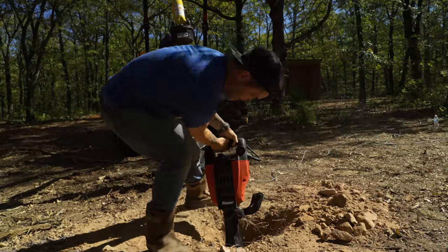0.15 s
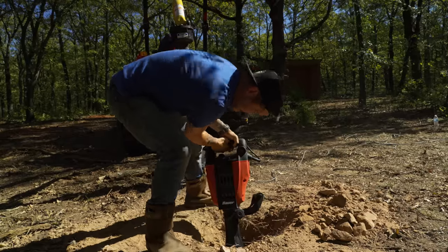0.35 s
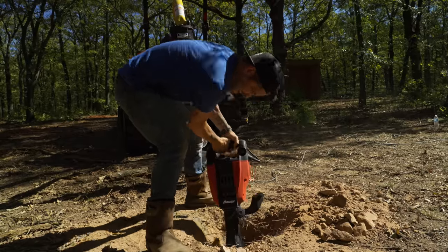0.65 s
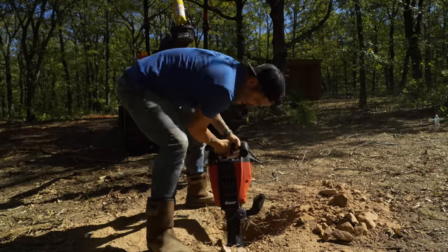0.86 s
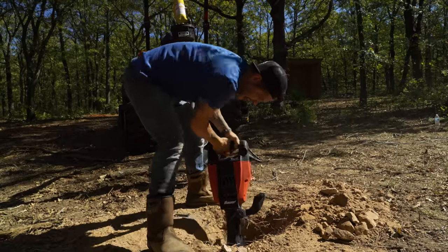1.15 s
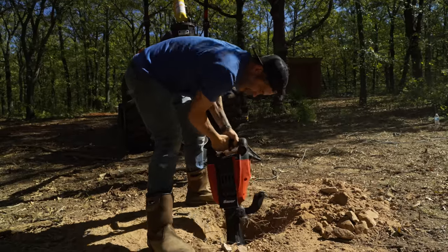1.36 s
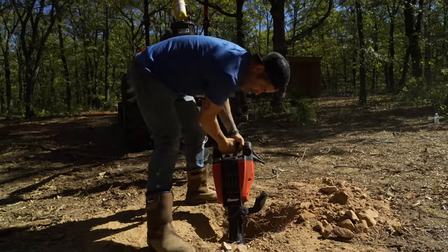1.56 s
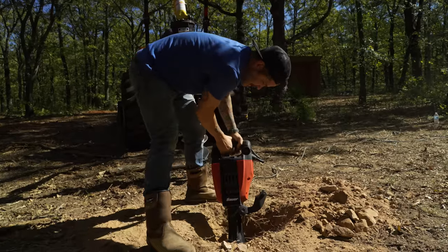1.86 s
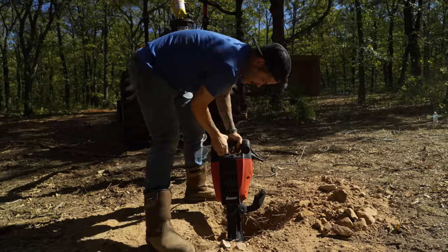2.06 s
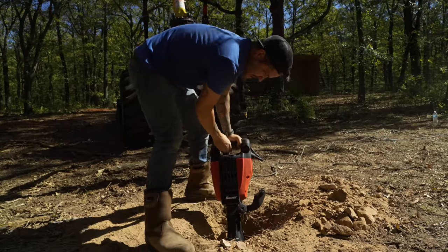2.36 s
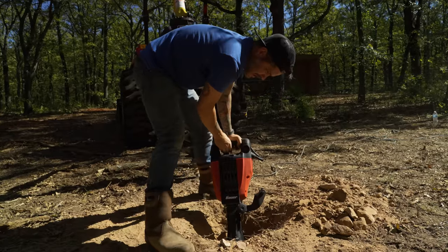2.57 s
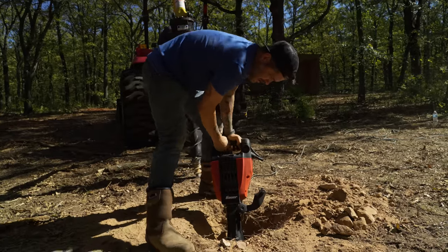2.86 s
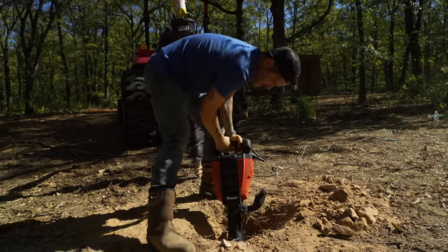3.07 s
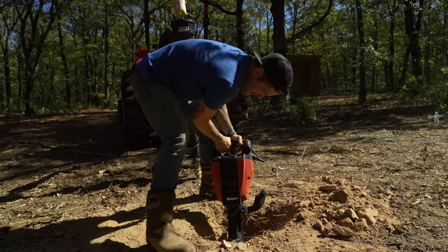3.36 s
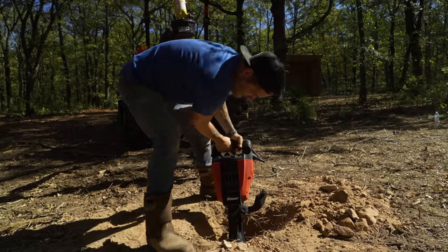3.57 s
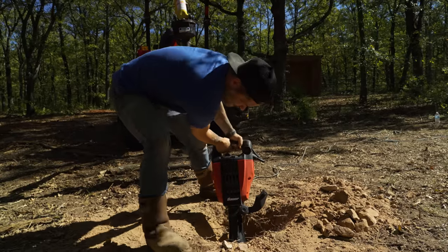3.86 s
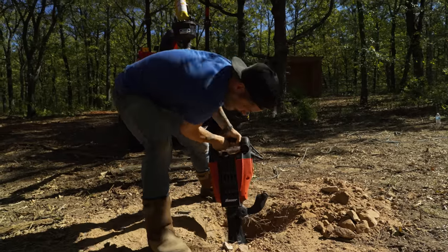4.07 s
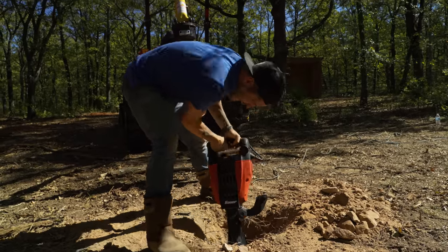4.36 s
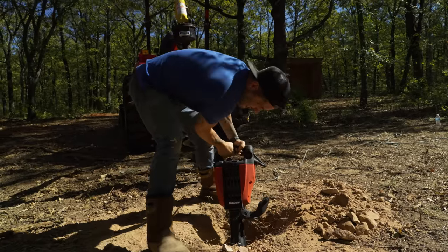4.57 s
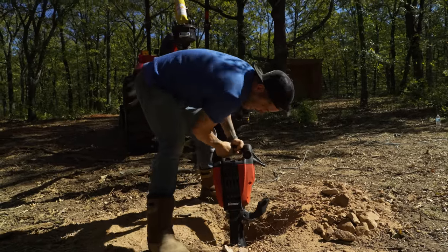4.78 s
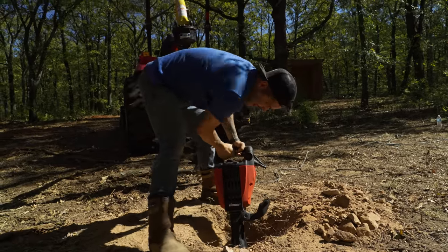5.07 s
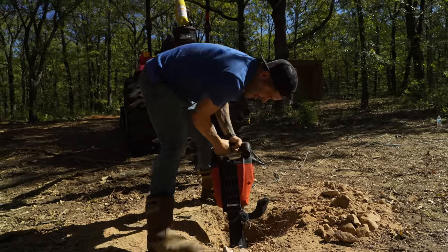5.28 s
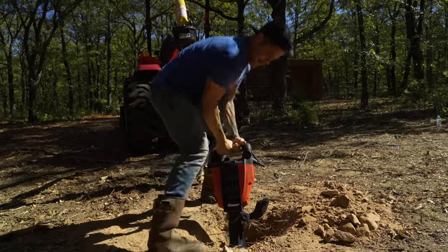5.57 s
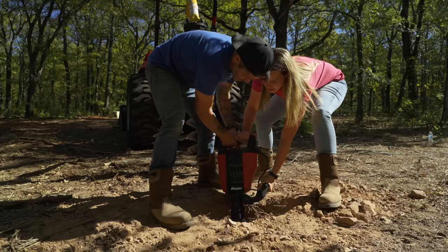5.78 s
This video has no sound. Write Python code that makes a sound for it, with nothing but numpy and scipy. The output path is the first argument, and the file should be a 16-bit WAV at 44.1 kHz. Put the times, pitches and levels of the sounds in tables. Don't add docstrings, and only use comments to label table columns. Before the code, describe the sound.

An electric demolition hammer grinds and clanks into rock outdoors, steel bit ringing and jingling, easing then pressing again, with a low generator hum at the end.

```python
import sys
import numpy as np
from scipy import signal
from scipy.fft import rfft, irfft, next_fast_len
from scipy.io import wavfile
from scipy.ndimage import uniform_filter1d

SR = 44100
rng = np.random.default_rng(int(sys.argv[2]) if len(sys.argv) > 2 else 0)


def waveform_to_disk(signal):
    frames = np.transpose(np.atleast_2d(signal))
    scaled = np.clip(frames, -1, 1) * 32767
    samples = np.round(scaled).astype(np.int16)
    wavfile.write(sys.argv[1], SR, samples)


def boost_factor(decibels):
    exponent = np.asarray(decibels, float) / 20
    return 10 ** exponent


N = 260631
T = np.arange(N) / SR
CUT_S = 5.834


def level(x, db=0):
    return x * boost_factor(db) / np.sqrt(np.mean(x ** 2))


def ring(x, modes):
    out = 0
    for k, (hz, width, db) in enumerate(modes):
        out = out + (-1) ** k * boost_factor(db) * signal.lfilter(*signal.iirpeak(hz, hz / width, SR), x)
    return out


def width_gain(modes):
    return np.sqrt(SR / sum(width for _, width, _ in modes) / 6)


def colour(x, points):
    hz, db = np.transpose(points)
    n = next_fast_len(N, True)
    log_hz = np.log(np.arange(1, n // 2 + 2) * SR / n)
    gain = boost_factor(np.interp(log_hz, np.log(hz), db, -90, -90))
    return level(irfft(rfft(x, n) * gain, n)[:N])


def fade(times, gains, ms):
    kicks, heard = np.zeros(N), times >= 0
    np.add.at(kicks, np.minimum(times[heard] * SR, N - 1).astype(int), gains[heard])
    return signal.lfilter([1], [1, -np.exp(-1000 / (ms * SR))], kicks)


def noise():
    return rng.standard_normal(N)


def smooth_twice(x, size):
    return uniform_filter1d(uniform_filter1d(x, size), size)


def rattle(per_s, scatter_db, ms, bed):
    slots_per_s = 400
    chance = rng.random((int(N / SR * slots_per_s), 2))
    hit = chance[:, 0] < per_s / slots_per_s
    times = np.arange(len(chance))[hit] / slots_per_s + chance[hit, 0] / per_s
    gains = boost_factor(-scatter_db * np.log(1 - chance[hit, 1]))
    return noise() * (bed + fade(times, gains, ms))


# time in seconds, peak in dB, crack in dB, keeper ring in dB.
PUSHED_CLANKS = [(0.4265, -9.5, 1.5, -24), (0.4695, 1.5, -18, -21), (0.5096, 1, -16, -21),
                 (0.5528, 0, -5.5, -13), (0.608, -2.5, -5, -11), (0.667, 1.5, -2, -19),
                 (0.8797, 0, -7.5, -17), (0.9525, 1, -13, -18), (0.9762, -6, -19, -12),
                 (1.047, -3, -1.5, -25), (1.168, -12.5, -13, -32), (3.759, -2.5, -9, -14),
                 (3.8384, -2, -11, -10), (3.905, -5.5, -8, -19), (3.9675, -1, -1.5, -29),
                 (4.032, -6.5, -27, -29), (4.4823, 0, -20, -15), (4.524, -2, -2, -14),
                 (4.573, -6.5, -2.5, -19), (4.6678, -2.5, -2, -27), (4.819, -3, -7, -18),
                 (4.864, -5.5, -1, -9), (4.918, 0.5, 1, -23), (5.1322, -4.5, -13, -22),
                 (5.1932, -1, -3, -14), (5.2773, 0.2, -3.5, -20), (5.715, -6, -2.5, -22)]
# time in seconds, peak in dB, crack in dB, keeper ring in dB, upper modes in dB.
LOOSE_CLANKS = [(1.271, 0.5, -9, -22, -7), (1.4074, -1.5, -21, -30, -5), (1.5519, -2, -8, -28, -7),
                (1.7034, -3, -7.5, -21, -5), (1.8481, -4.5, -8.5, -17, -10.5),
                (1.9783, -2, -10, -18, -10.5), (2.0773, -2, -5, -18, -5.5), (2.16, 1, -9.5, -18, -8),
                (2.2562, -2.5, -17, -17, -5.5), (2.373, -5, -8, -22, -3), (2.5273, -5.5, -7.5, -27, -5.5),
                (2.7225, -15, -6, -27, 1), (2.8852, -7.5, -11, -25, -2.5), (3.0473, -11.5, -8, -29, 0),
                (3.24, -8, -19, -30, -4), (3.4628, -15, -15, -31, -7), (3.654, -13.5, -15, -29, -7.5)]
# time in seconds, peak in dB, crack in dB, upper modes in dB.
REBOUNDS = [(0.8149, -13, -26, -11), (1.299, -2, -13, -8), (1.4334, -24.5, 8, -2), (1.45, -11.5, -17, -12),
            (1.577, -10, -7, -2.5), (1.7274, -14.5, -8, 0.5), (1.8726, -6.5, -12, -17),
            (2.003, -15, -5, -1.5), (2.4074, -10.5, -13, -2), (2.741, -18, -22, 0), (2.919, -26.5, -1, 2.5),
            (3.0782, -26, -17, 5), (3.26, -17, -24, -5), (4.159, -8, -38, -24), (4.5162, -4, -7, -13),
            (4.6186, -5, -7, -2.5), (5.314, -17, -10, -4), (5.553, -13.5, -22, -9),
            (5.6366, -10.5, -17, -7), (5.662, -24, -20, 3), (5.772, -13.5, -5, 1)]


def blows():
    pushed = [(s, db, crack, 0.34 * crack) for s, db, crack, _ in PUSHED_CLANKS]
    loose = [row[:3] + row[4:] for row in LOOSE_CLANKS]
    return np.transpose(pushed + loose + REBOUNDS)


def runs_loose(s):
    return (s >= LOOSE_CLANKS[0][0]) & (s <= LOOSE_CLANKS[-1][0])


# pitch in Hz, width in Hz, level in dB.
STEEL = [
    [(3370, 160, 0.5), (2940, 380, -2), (3740, 640, -4.5), (1760, 730, -8.5)],
    [(4470, 230, 1.6), (5080, 680, 6.7), (5520, 1960, 3.6)],
    [(6980, 150, 11.5), (7370, 124, 12), (8450, 260, 7), (7090, 24, 9), (7400, 31, 9.5), (8400, 8600, -17),
     (12600, 2400, -2.5)],
]
# scrape length in ms, first blow over scrape as a ratio.
BURST = [
    (1.92, 2.5),
    (1.49, 0.34),
    (1.85, 2.6),
]
CLANK_HZ = [3150, 3300, 3260, 3230, 3060, 3300, 3410, 3350, 3250, 3540, 3130, 3370, 3080, 2920, 3600, 3350,
            3470, 3330, 3500, 3250, 3350, 3550, 3450, 3480, 3520, 3450, 3120, 3190, 3270, 3150, 3220, 3320,
            3290, 3280, 3235, 3450, 3370, 3340, 3630, 3230, 2980, 3280, 3630, 3040]
ONSET_DELAY_S = .0007


def clanks():
    s, peak_db, crack_db, upper_db = blows()
    scatter_db = 1.5 * rng.standard_normal(len(s))
    shank_db = np.where(runs_loose(s), 2 * upper_db, -60)
    part_db = [0 * s, upper_db + scatter_db, crack_db, shank_db]
    part_modes = STEEL + [[(4420, 330, 0)]]
    part_burst = BURST + [(0.5, 5.2)]

    latest = np.argsort(s)[np.clip(np.searchsorted(np.sort(s), T) - 1, 0, None)]
    middle_hz, hz_per_db = 3300, 45
    clank_hz = np.r_[CLANK_HZ, np.full(len(REBOUNDS), middle_hz)]
    lean_db = (clank_hz - middle_hz) / hz_per_db
    body_lean = [0, -1, 1, 0]

    out = 0
    for part, (modes, (ms, blow), rel_db) in enumerate(zip(part_modes, part_burst, part_db)):
        gain = boost_factor(peak_db + rel_db + 3.0)
        scrape = noise() * uniform_filter1d(fade(s + ONSET_DELAY_S, gain, ms), size=70)
        drive = scrape + blow * fade(s + ONSET_DELAY_S, gain, 0.015)
        rung = ring(drive, modes[:1])
        for k, mode in enumerate(modes[1:], 1):
            share_db = 1.5 * rng.standard_normal(len(s))
            if part == 0:
                share_db = share_db + body_lean[k] * lean_db
            rung = rung + (-1) ** k * ring(drive * boost_factor(share_db)[latest], [mode])
        out = out + rung * width_gain(modes)
    return out + 0.04 * np.roll(out, int(0.0048 * SR))


# time in seconds, top ring in dB, long ring in dB,
# low ring in dB.
KEEPER_TOUCHES = [(0.4375, -26.3, -30.6, -32), (0.4519, -22, -31, -27), (0.5277, -21, -17, -28),
                  (0.5653, -19.2, -23.8, -18), (0.581, -12, -17, -37), (0.5958, -18.5, -20, -29.0),
                  (0.6203, -7.5, -21, -12), (0.6537, -18.1, -18.2, -32), (0.8938, -8, -14.4, -13),
                  (0.9088, -11, -6, -24.9), (0.9234, -13, -20.8, -12), (0.9356, -15, -15, -26),
                  (0.9613, -14, -20.8, -25.5), (0.991, -7, -17, -22), (1.021, -29.1, -24.7, -40.5),
                  (1.027, -31, -23, -36.4), (1.0439, -15, -19.5, -28), (1.2933, -11, -21, -23.9),
                  (1.3168, -21, -19, -32.3), (1.4222, -15, -16, -37), (1.454, -19, -28, -40.3),
                  (1.5663, -17, -19, -33), (1.5824, -29, -23, -30), (1.725, -19, -37, -34),
                  (1.7527, -25.5, -18, -31.7), (1.8673, -15, -31, -30), (1.893, -21.3, -16.5, -34),
                  (1.99, -22.0, -25.1, -32), (1.999, -13.0, -14, -30), (2.0133, -13, -17.4, -15),
                  (2.021, -23.5, -19, -31.6), (2.06, -28.5, -24, -37.9), (2.103, -7, -17, -27.1),
                  (2.111, -29.5, -22, -32), (2.1425, -19, -20.9, -32.1), (2.1876, -7.5, -13, -23),
                  (2.235, -25.2, -32, -37.1), (2.264, -23, -34, -21), (2.2886, -13, -12, -26),
                  (2.3903, -21, -19, -21), (2.3983, -18, -22.3, -29),
                  (2.4195, -25, -18.5, -35), (2.5546, -25, -24, -35.6), (2.908, -23, -27, -36.6),
                (2.9161, -29, -23, -37.1), (3.0723, -27.4, -21, -40.8), (3.6795, -33, -23, -40.8),
                (3.764, -21.7, -30, -32.5), (3.783, -20, -25.5, -29), (3.8449, -16, -27.0, -35.4),
                (3.8581, -13, -13, -20), (3.892, -24.7, -20, -33.3), (3.9151, -12, -19.6, -16),
                (3.923, -12, -20, -30.3), (3.9347, -18, -26, -32.3), (3.9568, -26.7, -31, -35),
                (3.9841, -27.9, -26, -37.7), (3.9973, -21, -33, -30.9), (4.031, -19, -35, -34),
                (4.4365, -25, -35, -36.5), (4.5025, -20.6, -28, -36), (4.515, -16.9, -20.4, -29),
                (4.5406, -10, -10, -22.3), (4.5705, -9, -16.9, -23.7), (4.582, -18, -21, -27),
                (4.6078, -14, -17, -23), (4.627, -18, -19, -29.6), (4.6356, -14, -17, -27.4),
                (4.687, -18, -23, -36), (4.8362, -20.8, -14, -31.1), (4.8721, -10.6, -18, -16),
                (4.8844, -7, -19, -23.5), (4.901, -15, -14, -31), (5.1442, -16, -22.5, -30.3),
                (5.1536, -20, -25.4, -28), (5.2055, -15.0, -23, -26), (5.223, -18, -24.8, -30.6),
                (5.2308, -26.1, -21, -35.2), (5.2888, -24, -39, -36), (5.71, -8, -14.0, -18.1)]
RING_HZ = [
    [13110, 13200, 13010],
    [12478, 12540, 12400],
    [11480, 11710, 10900],
]
# time to fall 60 dB in seconds, level in dB.
RING_DECAYS = [
    [(.07, -3), (.06, -8), (.06, -8)],
    [(.24, -8), (.04, -10), (.04, -12)],
    [(.07, -3), (.06, -10), (.06, -16)],
]


def keeper_contacts():
    choked = .4
    rows = []
    for clank_rows, share in ((PUSHED_CLANKS, choked), (LOOSE_CLANKS, 1)):
        for s, _, _, db, *_ in clank_rows:
            rows.append((s, db, db - 0.5, db - 10, share))
    for row in KEEPER_TOUCHES:
        rows.append((*row, 1 if runs_loose(row[0]) else choked))
    return np.transpose(sorted(rows))


def jingles():
    s, *levels, share = keeper_contacts()
    s = s + ONSET_DELAY_S
    last = np.clip(np.searchsorted(s, T) - 1, 0, None)
    age = np.where(T > s[0], T - s[last], 9)
    chatter = level(ring(rattle(250, 2.2, 1.4, 0.38), [(13100, 1260, 2), (12400, 460, 3)]))
    out = boost_factor(levels[0] - 10.5)[last] * np.exp(-age * 1000 / 6.5) * chatter
    for group_hz, decays, db in zip(RING_HZ, RING_DECAYS, levels):
        for hz, (t60, mode_db) in zip(group_hz, decays):
            is_long = t60 > .1
            chance = rng.standard_normal((len(s), 2))
            lasts = t60 * share[last] if is_long else t60
            scatter_db = 1.2 if t60 > .065 else 4
            size = boost_factor(db + mode_db + scatter_db * chance[:, 0])[last]
            size = size * np.exp(-np.log(1000) * age / lasts)
            wobble = 1 + (.45 if is_long else .55) * level(smooth_twice(noise(), 100))
            pitch = hz + chance[last, 1] * 2 / t60
            tone = np.sin(2 * np.pi * np.cumsum(pitch) / SR)
            out = out + uniform_filter1d(size, size=80) * wobble * tone
    return out


# time in seconds, peak in dB, pitch in Hz.
KNOCKS = [(0.21, -10.5, 1710), (0.292, -8, 1800), (0.412, -13, 1390), (0.456, -11.5, 1650),
          (0.499, -5.5, 1580), (0.543, -8.5, 1485), (0.592, -10, 1360), (1.294, -9.5, 1634),
          (1.406, -5.5, 1410), (2.481, -22, 1805), (2.768, -19.5, 1810), (2.842, -18.5, 1814),
          (3.002, -17.5, 1600), (3.208, -23, 1820), (3.905, -4, 1450), (3.969, -4, 1440),
          (4.078, -16, 1620), (4.124, -9, 1660), (4.166, -7, 1690), (4.171, -11.5, 1764), (4.207, -15, 526),
          (4.463, -12, 1670), (4.523, -4, 1720), (4.603, -8.5, 1673), (4.652, -12, 1500),
          (4.803, -16, 1320), (4.865, -3.5, 1605), (5.256, -11, 1664), (5.665, -12, 1530), (5.715, 3, 1598),
          (5.7735, -8, 1530)]
# time in seconds, peak in dB, pitch in Hz.
ROCK_CHIP = [
    (5.6612, -11.5, 744),
    (5.664, -15, 1025),
    (5.665, -15, 2410),
]


def knocks():
    length = 2048
    out, age = np.zeros(N + length), np.arange(length) / SR
    listed, blow_s = np.array(KNOCKS)[:, 0], blows()[0]
    every = KNOCKS + ROCK_CHIP
    for s, db, *_ in PUSHED_CLANKS + LOOSE_CLANKS:
        if np.abs(listed - s).min() > .015:
            every = every + [(s - .001, db - 10, 1650 + 243 * rng.standard_normal())]
    for s, db, hz in every:
        hard = np.abs(blow_s - s).min() < .004
        last_s, width = (.0022, 430) if hard else (.0055, 230)
        swell = np.exp(-age / last_s) * (1 - np.exp(-age / 0.0012))
        tone = .45 * np.sin(2 * np.pi * hz * age)
        modes = [(hz, width, 0), (.45 * hz, 400, -12), (1.4 * hz, 800, -6)]
        body = ring((rng.standard_normal(length) + tone) * swell, modes)
        start = int(s * SR)
        out[start:start + length] += boost_factor(db) * body / np.abs(body).max()
    return out[:N]


# time in seconds, thud in dB, casing in dB.
THUDS = [(0.4249, -39, -19.5), (0.4715, -23, -41), (0.511, -23, -35), (0.5531, -26, -25),
         (0.6072, -18.5, -21), (0.6669, -28.8, -21), (0.8814, -24, -25), (0.9529, -30.7, -27),
         (0.9766, -43, -18.5), (1.047, -23, -26), (1.272, -21, -21), (1.2977, -33, -19),
         (1.408, -25.5, -32), (1.553, -25, -26), (1.5775, -23.5, -30), (1.7039, -19, -34),
         (1.8504, -23.5, -28), (1.979, -22, -30), (2.0774, -20, -23), (2.16, -20, -17), (2.256, -18, -21),
         (2.3733, -20, -25.5), (2.527, -23, -32), (2.724, -26, -27), (2.885, -19.5, -21),
         (3.0474, -23, -26.5), (3.2408, -25, -27), (3.7595, -16.5, -18), (3.838, -20, -27),
         (3.9056, -19, -24), (3.9669, -22, -17), (4.156, -31, -26), (4.4835, -30, -21), (4.5233, -29, -18),
         (4.574, -26, -25), (4.618, -28, -19), (4.67, -38, -27), (4.82, -26.5, -23), (4.8649, -30.1, -18),
         (4.9192, -25, -20), (5.1322, -21, -19), (5.1932, -31, -17), (5.2786, -33, -25), (5.7142, -38, -33)]


def thuds():
    s, soil_db, casing_db = np.transpose(THUDS)
    soil, casing = [(228, 74, 3), (345, 166, -4.5)], [(663, 530, 0)]  # (Hz, width Hz, dB)
    out = 0
    for modes, db, push_ms in ((soil, soil_db, 4.7), (casing, casing_db, 2.5)):
        drive = noise() * fade(s, boost_factor(db), push_ms) + 5.25 * fade(s, boost_factor(db), 0.031)
        out = out + boost_factor(3.0) * ring(drive, modes) * width_gain(modes)
    return out


# time in seconds, strokes done as a count.
TURNS = [(-0.02, 0), (0.171, 5), (0.335, 9), (0.6086, 15), (0.7563, 19), (1.2581, 35), (2.0304, 59),
         (2.5133, 75), (2.7687, 83), (3.0341, 91), (3.528, 107), (3.9351, 119), (4.031, 122), (4.21, 126),
         (4.484, 133), (4.919, 142), (5.0595, 146), (5.92, 173.3)]
# time in seconds, peak in dB.
TAPS = [(0.0084, -9), (0.0187, -13), (0.0371, -11), (0.0558, -7.5), (0.0753, -11), (0.083, -10),
        (0.0938, -6), (0.106, -14), (0.122, -13), (0.132, -7.5), (0.1515, -11), (0.16, -12), (0.17, -7),
        (0.192, -14), (0.2014, -16), (0.211, -8), (0.231, -13), (0.2395, -15), (0.2515, -9), (0.273, -19),
        (0.2798, -12), (0.292, -9.5), (0.312, -11), (0.334, -9.5), (0.356, -11), (0.378, -9.5),
        (0.3934, -17), (0.6933, -24), (0.7149, -8.5), (0.7436, -9), (0.7827, -13), (0.864, -8), (0.871, -4),
        (4.0164, -15.5), (4.064, -17), (4.0775, -9), (4.1127, -10.5), (4.1978, -12.5), (4.207, -17),
        (4.2325, -15.5), (4.251, -17), (4.271, -13.5), (4.2877, -12), (4.305, -15), (4.3285, -14),
        (4.364, -11), (4.3948, -15), (4.4134, -18), (4.4307, -24), (4.4408, -20), (4.7075, -12),
        (4.7176, -10.5), (4.7236, -9.5), (4.7456, -21), (4.7634, -7), (4.77, -13), (4.807, -8),
        (4.8832, -5), (4.9, -12), (4.963, -13)]
STROKE_TAPS_DB = [
    0,
    -9,
    -3,
    -8,
]


def stroke_taps(load_db):
    at, turns = np.transpose(TURNS)
    strokes = int(turns[-1])
    chance = rng.standard_normal((4 * strokes, 2))
    taps = np.interp(np.arange(4 * strokes) / 4, turns, at) + .0006 * chance[:, 0]
    size = boost_factor(1.8 * chance[:, 1] + np.tile(STROKE_TAPS_DB, strokes))
    puff = fade(taps[::4], size[::4], 6.5)
    listed, tap_db = np.transpose(TAPS)
    taken = np.r_[listed, np.array(KNOCKS)[:, 0]]
    regular = np.abs(taps[:, None] - taken).min(axis=1) > .022
    listed_size = boost_factor(tap_db - np.interp(listed, T, load_db) - 17.5)
    return np.r_[taps[regular], listed], np.r_[size[regular], listed_size], puff


def gripped(drive, modes):
    out = 0
    for k, mode in enumerate(modes):
        grip = boost_factor(1.5 * level(smooth_twice(noise(), 1500)))
        out = out + grip * ring(drive, [mode]) * (-1) ** k
    return out


# time in
# seconds, pitch in Hz.
PANEL = [(0.0, 1880), (0.4, 1720), (0.5, 1580), (0.64, 1310), (3.9, 1330), (4.14, 1675), (4.5, 1750),
         (4.72, 1485), (4.9, 1390)]


def sinking_panel(jolts):
    turn = np.exp(2j * np.pi * np.cumsum(np.interp(T, *np.transpose(PANEL))) / SR)
    slow = signal.lfilter(*signal.butter(1, 45, fs=SR), jolts / turn)
    return (slow * turn).real


# time in seconds, level in dB.
LOAD = [(0.0, -20), (0.45, -27), (0.89, -30), (1.66, -36), (2.09, -33), (2.8, -37), (3.56, -39),
        (3.75, -30.5), (4.04, -27.5), (4.4, -24), (4.9, -29.5), (5.42, -32.5), (5.83, -33)]
# pitch in Hz, width in Hz, level in dB.
HOUSING = [(507, 172, -6.5), (1210, 148, -0.5), (1650, 240, 1.5), (1944, 250, 1.5), (2292, 92, -4)]
# pitch in Hz, width in Hz, level in dB.
GEARCASE = [(4030, 2400, 22.5), (3330, 720, 5), (3810, 190, 18), (5520, 170, 15)]
# frequency in Hz, level in dB per Hz.
SHAKE = [(82, -10), (140, -0.5), (488, -10.5), (562, -7.5), (1020, -9), (1300, -1.5), (1690, -53),
         (2860, -120)]
# frequency in Hz, level in dB.
GRIT = [(1350, -4), (2300, 1.5), (2630, 2), (3870, -8), (6200, -14), (8600, -11.5), (11000, -28),
        (15400, -45)]
# frequency in Hz, level in dB.
AIR = [(3240, -8), (5500, 5), (6580, -9.5), (8870, -5.5), (10700, -13), (11900, -7.5), (15200, -16),
       (15750, -30)]


def housing():
    load_db = np.interp(T, *np.transpose(LOAD))
    grind, load = boost_factor(load_db), np.clip((load_db + 35) / 9, 0, 1)
    over_db = load_db + 30
    shake, grit = boost_factor(-34.5 + 0.5 * over_db), boost_factor(-32.5 + 0.98 * over_db)
    air = boost_factor(-47.5 + 0.48 * over_db) * np.where(T > CUT_S, boost_factor(8.5), 1)
    taps, size, puff = stroke_taps(load_db)

    tapping = noise() * uniform_filter1d(fade(taps, size, 4.0), size=30)
    jolts = (1 - .4 * load) * rattle(120, 1.6, 2.5, .6) + 3.0 * load * tapping
    jolts /= np.sqrt(uniform_filter1d(jolts ** 2, SR // 4))

    out = grind * level(gripped(jolts, HOUSING), 0.88)
    tap_drive = fade(taps, size, 0.056) + 0.3 * noise() * fade(taps, size, 3.6)
    tap_modes = [(1720, 330, -5.5), (3450, 320, -6.5), (4960, 270, -6.5)]
    out += grind * load * level(ring(tap_drive, tap_modes), -1.5)
    out += grind * load * level(sinking_panel(jolts), -9)
    out += shake * boost_factor(3.0) * colour(jolts + 0.96 * noise(), SHAKE)
    gears = colour(jolts + 0.45 * noise() * puff, GRIT)
    out += grit * level(gripped(gears, GEARCASE), 1.3)

    vent = ring(noise() * puff * (1 - 0.73 * load), [(8800, 1500, 0)])
    breath = noise() * (.7 + .6 * load + .35 * puff * (1 - load))
    hiss = colour(breath + .2 * load * jolts, AIR)
    return out + air * boost_factor(3.0) * (hiss + level(vent, -3))


# harmonic of the firing rate as a number, level in dB.
EXHAUST = [(1, -44), (2, -44), (3, -39), (4, -41), (5, -57), (6, -57), (7, -52.5), (8, -71), (9, -48.5)]
# frequency in Hz, level in dB per Hz.
NEAR_TONE = [(15, -13), (25, -7), (213, 0), (338, -12), (515, -12), (616, -16.5), (1190, -18),
             (3000, -26.5), (3900, -54), (6600, -120)]


def generator():
    firing_hz, first_firing_s = 33.333, .0083
    turn = (T - first_firing_s) * firing_hz + 0.28 * (T > CUT_S)
    chance = rng.standard_normal((int(turn[-1]) + 3, 2))
    cycle = np.round(turn).astype(int)
    size = uniform_filter1d(boost_factor(1.4 * chance[cycle, 0]), 300)
    angle = 2 * np.pi * (turn + uniform_filter1d(0.02 * chance[cycle, 1], 300))
    hum = -size * sum(np.sqrt(2) * boost_factor(db) * np.cos(k * angle) for k, db in EXHAUST)
    near = np.clip((T - CUT_S) / 0.002, 0, 1)
    pulse = np.diff(np.floor(turn), prepend=np.floor(turn[0]))
    rough = colour(rattle(95, 2.8, 4.8, 1.3) - 13 * pulse, NEAR_TONE)
    return hum * (1 + 2.0 * near) + near * boost_factor(-19.5) * rough


def scene():
    hits = clanks() + knocks() + thuds()
    tail = rng.standard_normal(8000) * 1000 ** (-np.arange(8000) / SR / 0.05)
    trees = signal.fftconvolve(hits, tail)[:N] * boost_factor(-32.5)
    return (hits + trees + jingles() + housing() + generator())[None]


def roll_off(x):
    return signal.sosfilt(signal.butter(12, 16220, fs=SR, output="sos"), x)


def record(dry):
    lowpass = signal.ellip(8, .2, 50, 16200, fs=SR, output="sos")
    x = signal.sosfiltfilt(lowpass, np.clip(dry, -1, 1))

    def band(lo, hi):
        return signal.sosfiltfilt(signal.butter(6, [lo, hi], "band", fs=SR, output="sos"), x)

    edge = band(15750, 20000)
    weak = uniform_filter1d(edge ** 2, 300) < boost_factor(-58) ** 2
    x = x - edge * uniform_filter1d(1. * weak, size=128)
    top = band(14400, 20000)
    keeper_power = uniform_filter1d(band(12200, 13600) ** 2, 900)
    masked = uniform_filter1d(top ** 2, 400) < boost_factor(-20) ** 2 * keeper_power
    finished = x - top * uniform_filter1d(1. * masked, size=128)
    return roll_off(finished)


dry = scene()
out = record(dry)
waveform_to_disk(out)
```